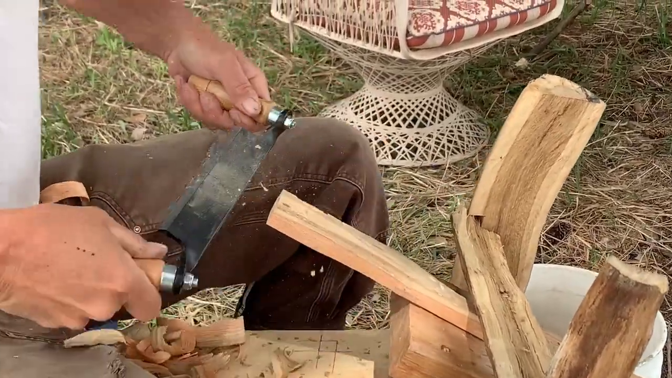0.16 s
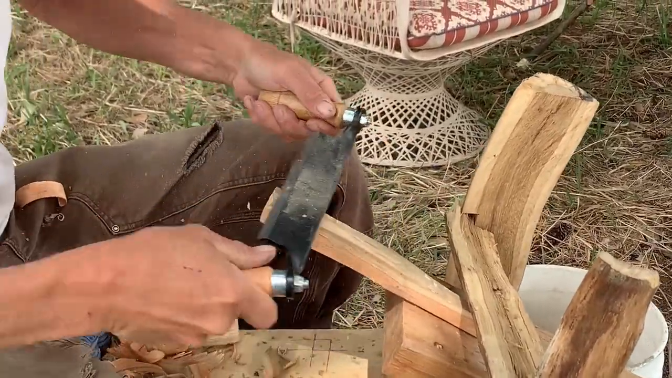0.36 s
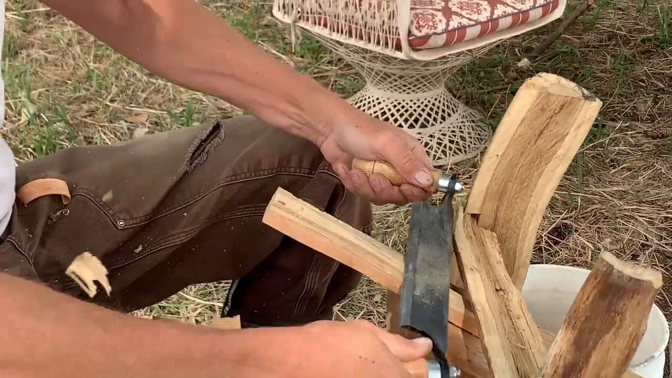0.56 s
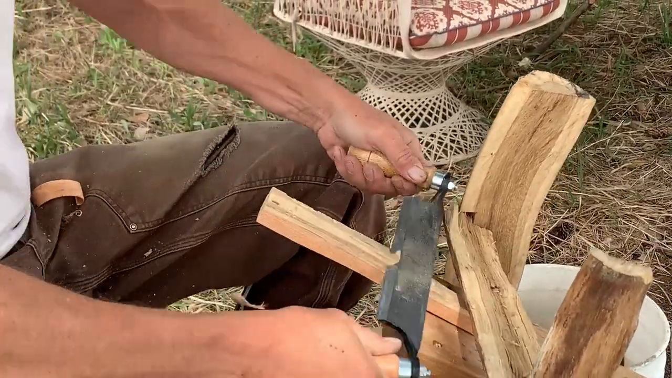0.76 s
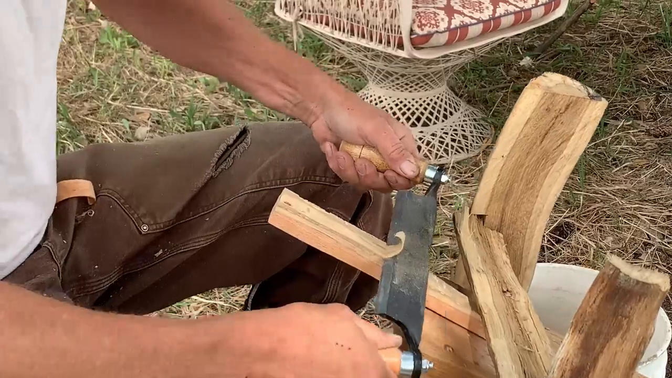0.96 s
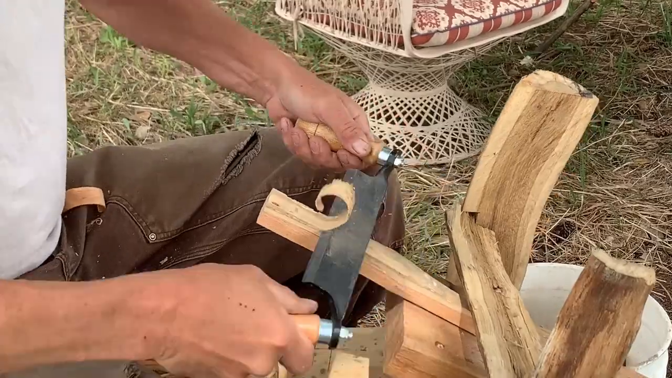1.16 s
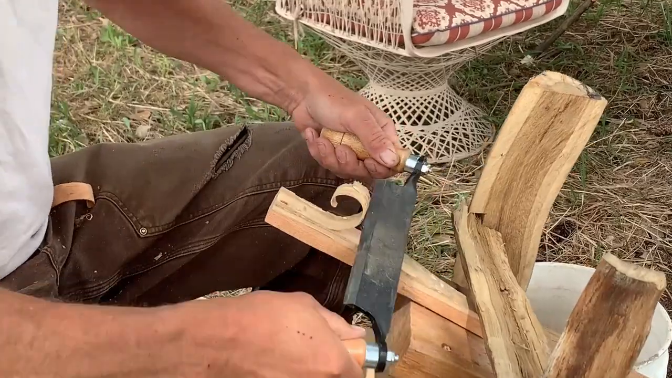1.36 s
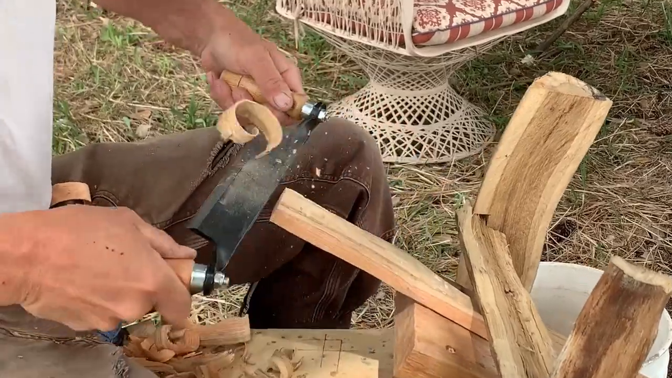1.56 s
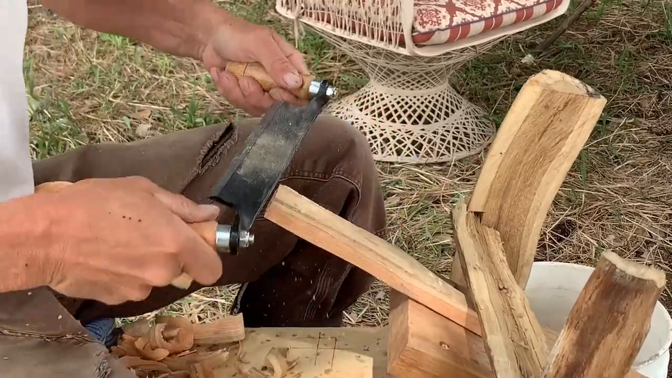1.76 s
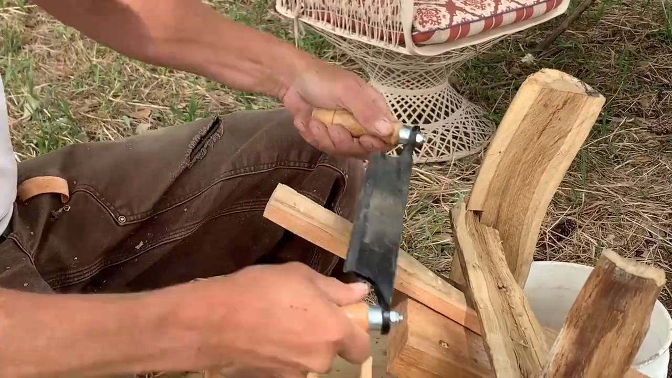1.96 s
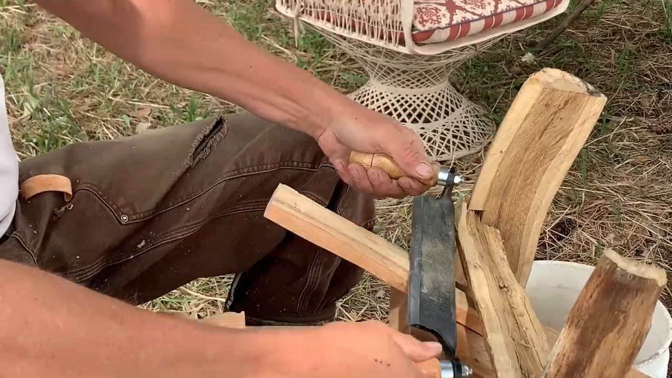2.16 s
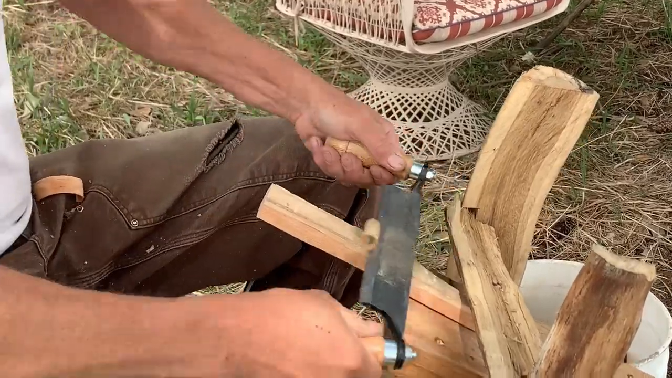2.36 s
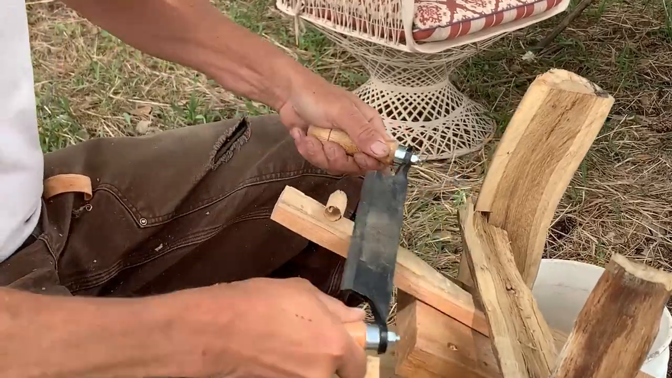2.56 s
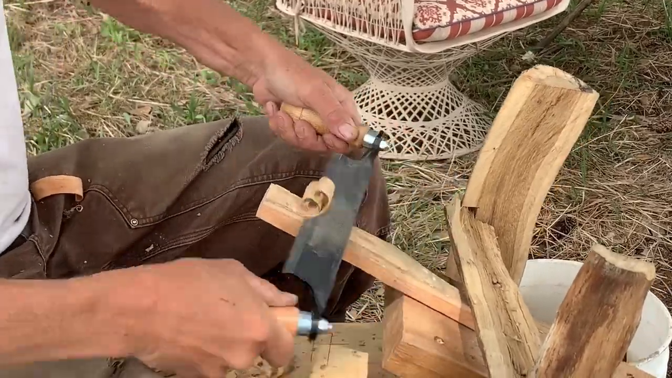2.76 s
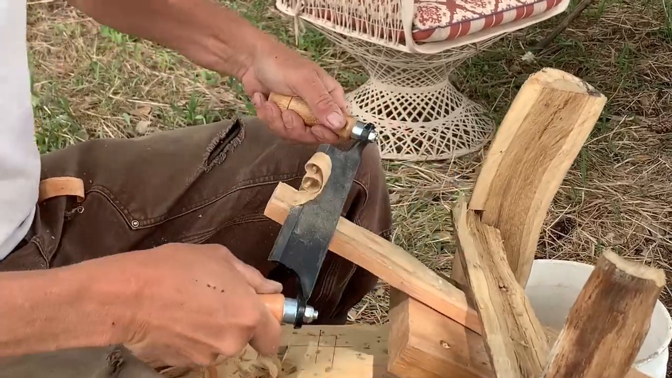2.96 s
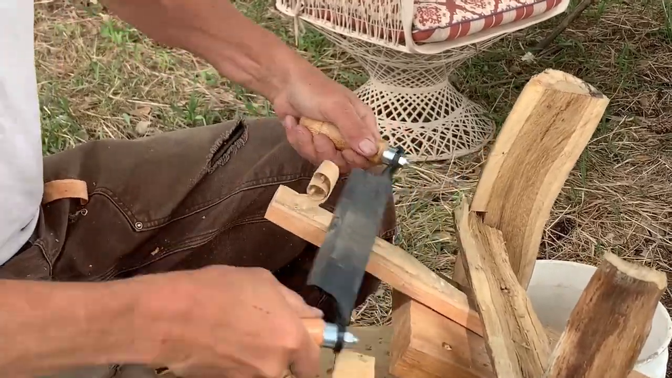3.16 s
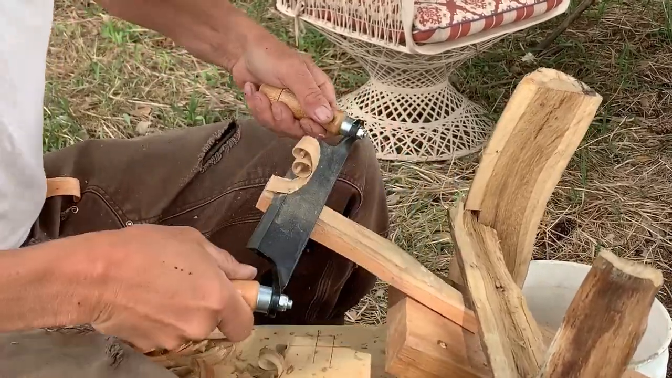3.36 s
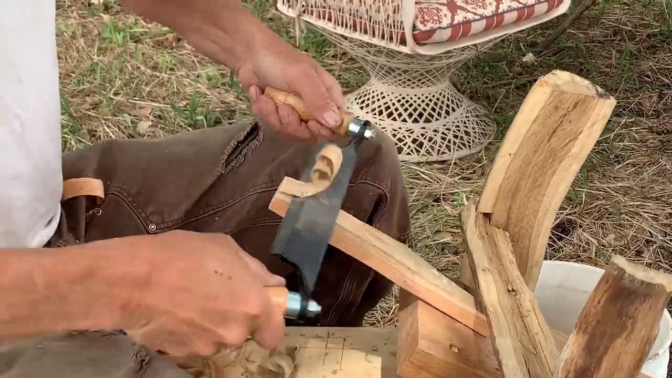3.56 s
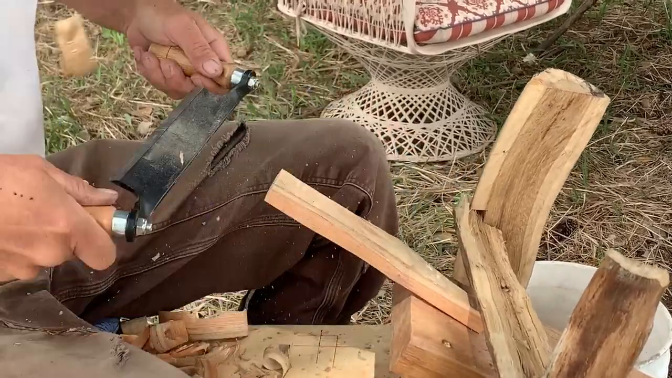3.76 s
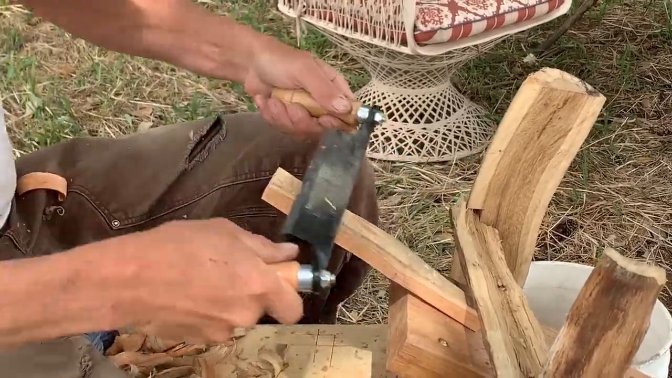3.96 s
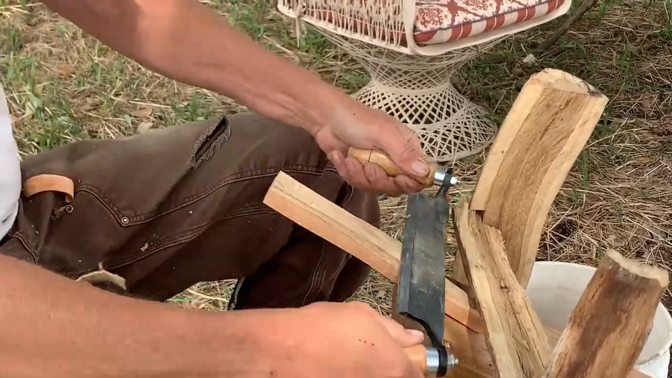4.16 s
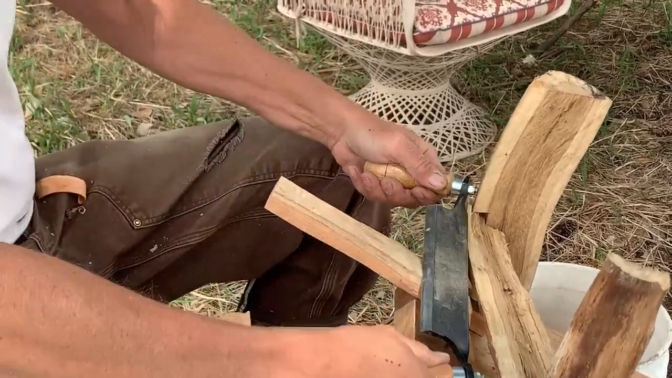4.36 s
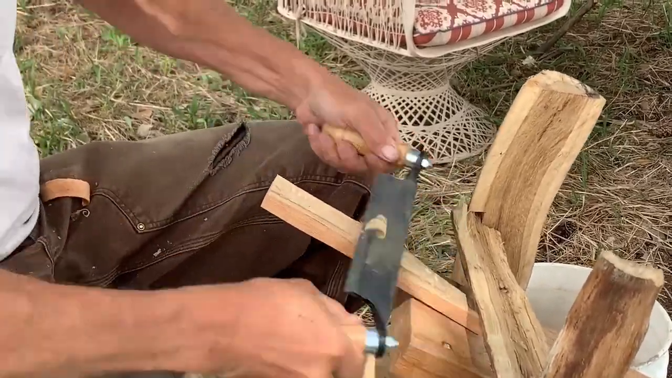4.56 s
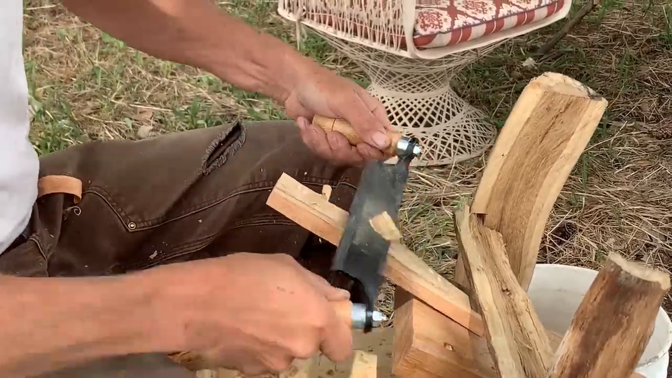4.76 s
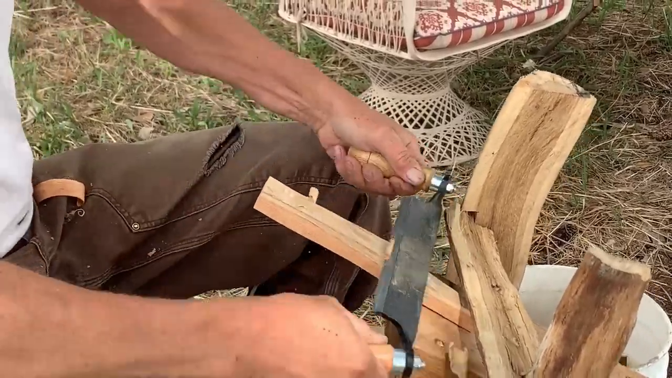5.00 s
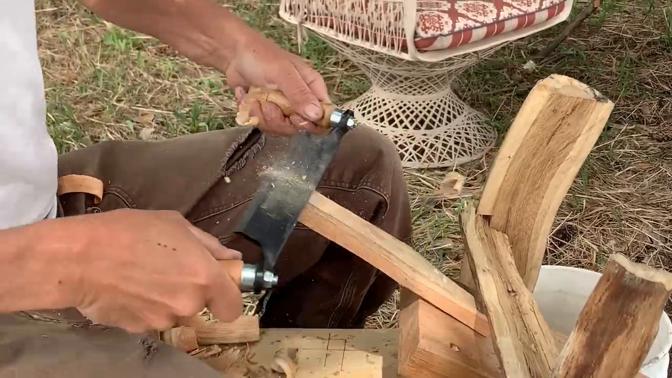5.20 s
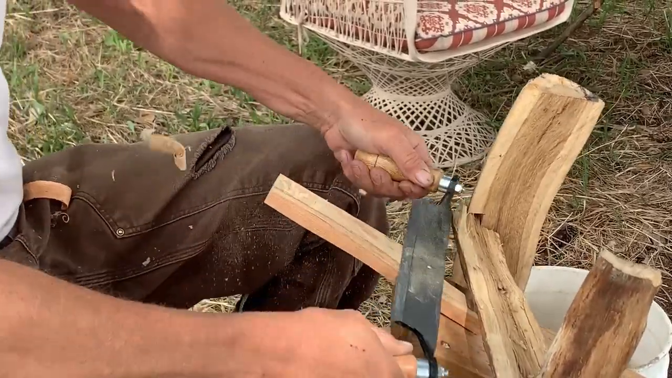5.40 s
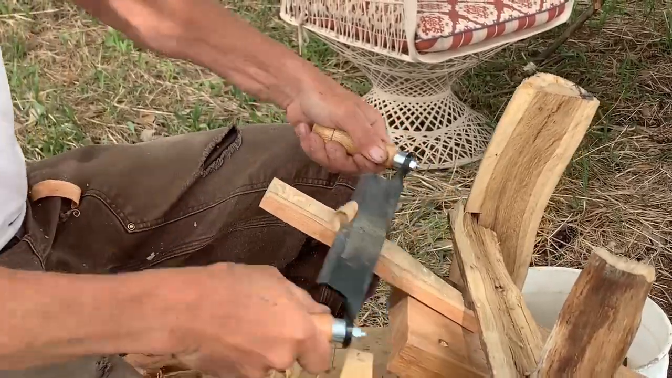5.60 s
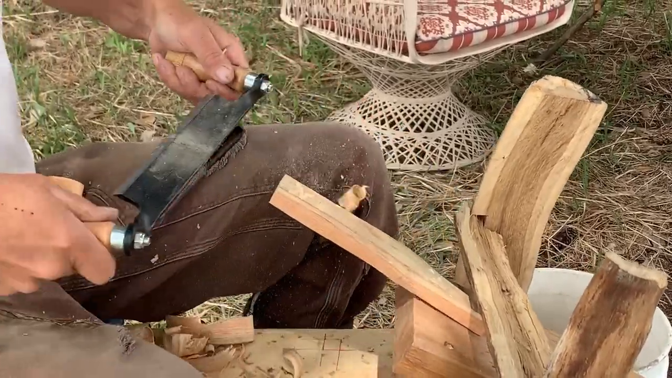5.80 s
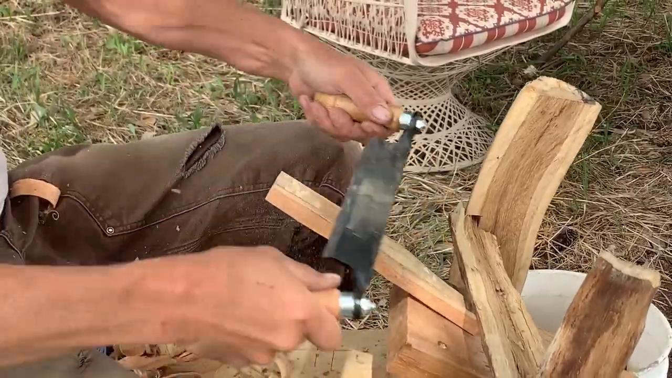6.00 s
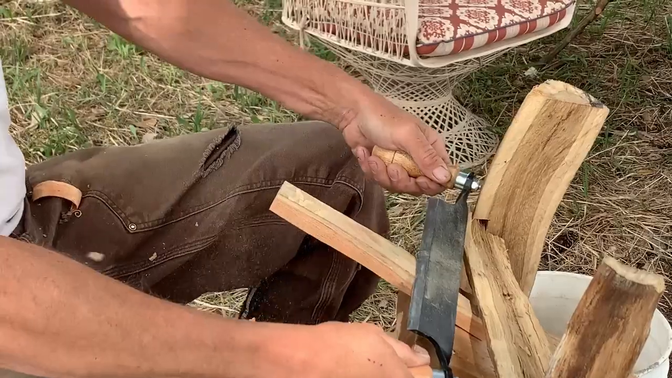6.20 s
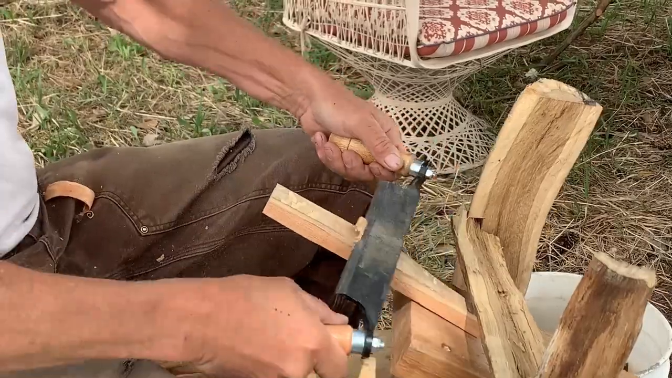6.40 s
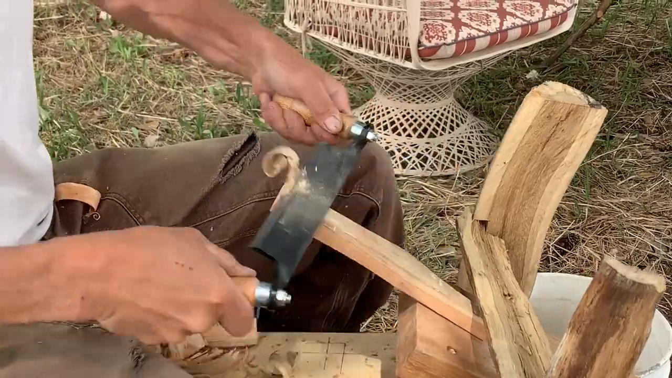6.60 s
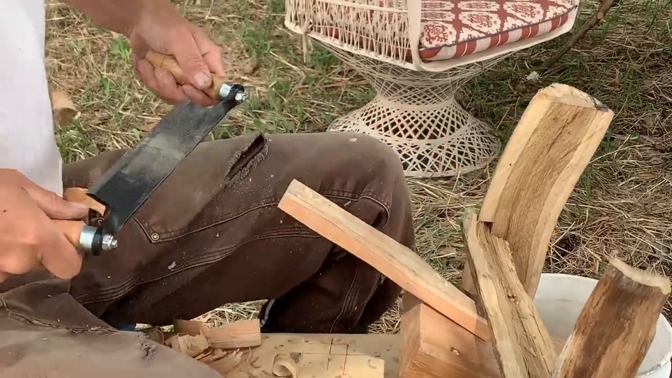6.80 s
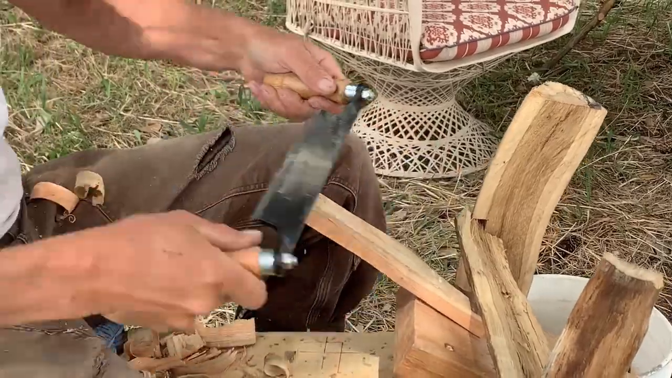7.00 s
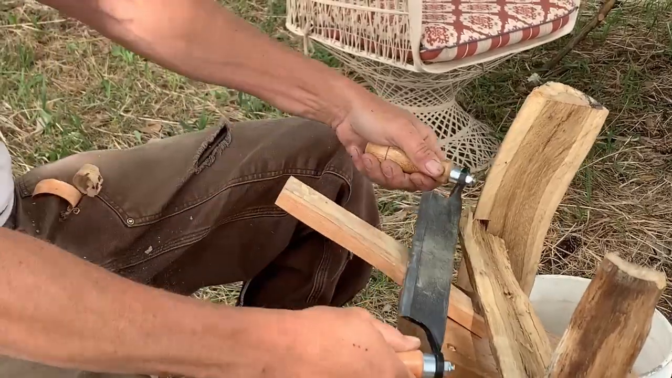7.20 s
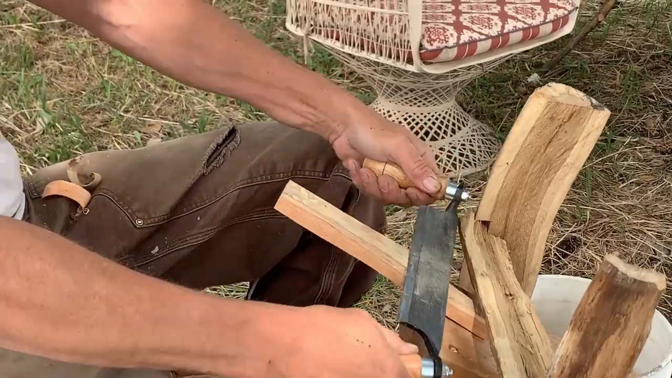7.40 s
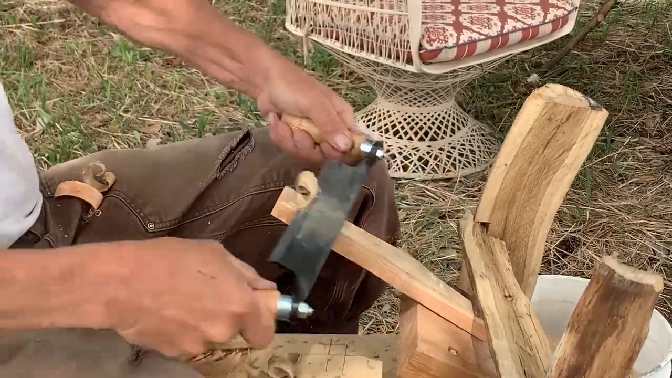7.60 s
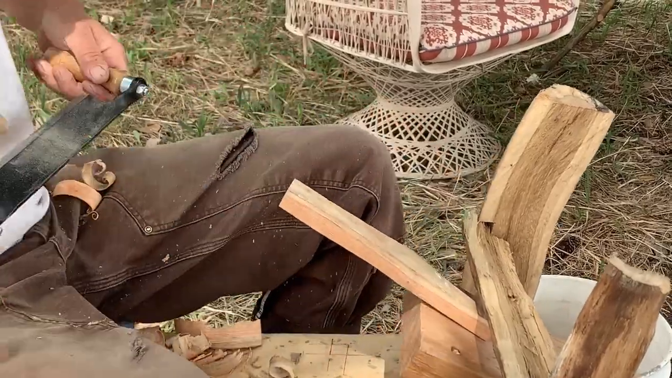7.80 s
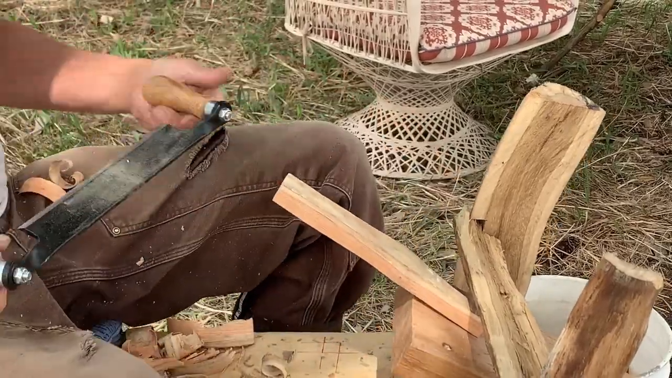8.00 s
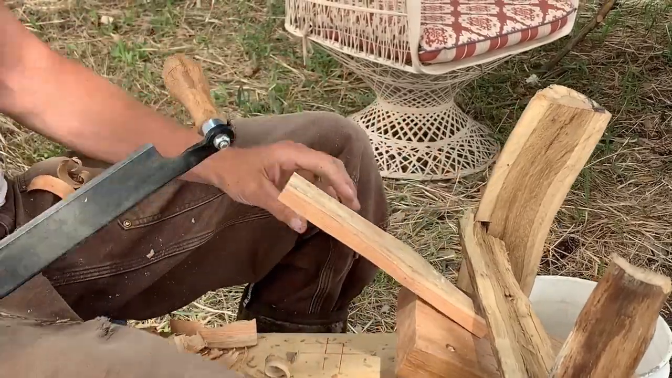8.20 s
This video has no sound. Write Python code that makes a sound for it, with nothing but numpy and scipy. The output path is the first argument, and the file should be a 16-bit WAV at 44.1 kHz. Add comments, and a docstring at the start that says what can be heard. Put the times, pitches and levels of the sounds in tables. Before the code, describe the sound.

Close up outdoors, a steel drawing blade shaves a clamped hardwood stick. Short, hissing, tearing scrapes of a fraction of a second come about every half second or so, each preceded or followed by clacks as blade meets wood. Some knocks ring steely and hard, others thud in the bench. Light slides and dry crumb ticks fill the gaps over a faint airy hush and low hum. Close stereo phone pickup, almost no echo.

```python
"""Drawknife on a hardwood stick

A two-handled steel blade is pulled along a hardwood stick clamped in a wooden bench, outdoors, near a phone.
Each pull tears fibres in a stream of tiny slips that ring blade and stick and shake the bench.
Knocks, snaps and ticks are short rattling contacts that ring the same blade and wood; light slides
and dry crumb ticks fill in around them, over a faint open-air hush and low hum made of filtered noise."""
import sys
import numpy as np
from scipy import signal
from scipy.fft import rfft, irfft
from scipy.io import wavfile
from scipy.ndimage import uniform_filter1d, map_coordinates

SR = 44100
rng = np.random.default_rng(int(sys.argv[2]) if len(sys.argv) > 2 else 0)


def makeup_ratio(level_db):
    """Linear amplitude ratio for a level in decibels (20 dB per factor of ten)."""
    decades = np.asarray(level_db, float) / 20
    return 10 ** decades


def to_wav(s):
    """Save 16-bit WAV."""
    ch = np.atleast_2d(s).T  # columns
    pcm = np.round(np.clip(ch, -1, 1) * 32767)  # PCM
    wavfile.write(sys.argv[1], SR, pcm.astype(np.int16))


N = 363825
T = np.arange(N) / SR


def unit(x):
    """Scale to rms 1."""
    return x / np.sqrt(np.mean(x ** 2))


def on_log(hz, table, column=1):
    """Read a table at frequencies, straight on a log axis."""
    table = np.array(table, float)
    return np.interp(np.log(np.maximum(hz, 1)), np.log(table[:, 0]), table[:, column])


def colour(x, table):
    """Filter by a (Hz, dB) spectrum."""
    return irfft(rfft(x) * makeup_ratio(on_log(np.fft.rfftfreq(len(x), 1 / SR), table)), len(x))


def ring(x, hz, width_hz):
    """One resonance, gain 1 at its centre."""
    return signal.lfilter(*signal.iirpeak(hz, hz / width_hz, fs=SR), x)


def walk(rate):
    """Random levels held 1 / rate s and slewed twice; spread near 1."""
    k = int(SR / rate)
    steps = np.repeat(rng.standard_normal(N // k + 1), k)
    return 1.685 * uniform_filter1d(uniform_filter1d(steps, k), k)[:N]


def slips(per_s, spread_db):
    """A stream of tiny slips of very uneven size and either sign, rms 1."""
    chance = rng.random((3, N))
    size = makeup_ratio(-spread_db * np.log(1 - chance[1])) * np.sign(chance[2] - .5)
    return unit((chance[0] < per_s / SR) * size)


# colour of the open-air hush: hz, density_db (dB per Hz, shape only)
YARD_COLOUR = [(27, -44), (38, -6.5), (70, -0.5), (110, -1.5), (250, -16.5), (450, -13.5), (1000, -21.5),
               (2200, -26.5), (4000, -34.5), (15500, -48), (16200, -66)]
# low hum as narrow bands of noise: hz, width_hz, level_db (rms)
HUM_BANDS = [(71.5, 18, -56.5), (147, 5.3, -67.5)]
HUSH_DB = -59


def yard():
    """Open-air hush of slowly wandering noise, and a low hum that wavers because its bands are narrow."""
    level_db = HUSH_DB + walk(0.47) + 1.8 * walk(22)
    hush = makeup_ratio(level_db) * unit(colour(rng.standard_normal(N), YARD_COLOUR))
    hum = sum(makeup_ratio(db) * unit(ring(rng.standard_normal(N), hz, width)) for hz, width, db in HUM_BANDS)
    return hush + hum


# colour of tearing fibres at the microphone, shared by cracks and crumbs: hz, density_db (dB per Hz, shape only)
FIBRE_COLOUR = [(2200, -29), (3300, -4.5), (4500, 1.5), (5500, -4), (6000, 1.5), (6600, -1.5), (8300, 2.5),
                (9600, -4.5), (14500, -4.5), (15600, -3.5), (16100, -31.5)]
CRUMBS_PER_S, CRUMBS_DB, CRUMB_DECAY_S = 22, -75, .002


def crumbs():
    """Bits of shaving drop and settle with faint dry ticks, each a decaying burst of noise."""
    t = np.arange(1024) / SR
    bursts = signal.fftconvolve(np.abs(slips(CRUMBS_PER_S, 3)), np.exp(-t / CRUMB_DECAY_S))[:N]
    return makeup_ratio(CRUMBS_DB) * unit(bursts * colour(rng.standard_normal(N), FIBRE_COLOUR))


def rings(contact, modes, lean_db, damping):
    """One blow on a set of modes, peak 1; damping widens every mode."""
    sound = sum(makeup_ratio(db + lean) * ring(contact, hz, damping * width)
                for (hz, width, db), lean in zip(modes, lean_db))
    return sound / np.abs(sound).max()


# rings of the steel blade: hz, width_hz, level_db
BLADE_RINGS = [(1260, 20, -22.5), (1449, 110, -18), (1529.8, 140, -9.5), (1720, 150, -14.5),
               (1920, 51, -3.5), (2170, 72, -6), (2325, 35, -13), (2500, 83, -15), (2946, 59, -10),
               (3304, 57, -20.5), (4140, 640, -24), (4530, 140, -37)]
# rings of the clamped stick: hz, width_hz, level_db
STICK_RINGS = [(311, 43, -4), (499, 38, -13), (579, 39, -7.5), (702, 24, -3.5), (846.4, 25, 1),
               (936, 22, -14.5), (1180, 52, -11)]
# rings of the bench: hz, width_hz, level_db
BENCH_RINGS = [(97.5, 11, -4), (163.4, 35, -5.5), (204.5, 23.5, 2.5), (250.3, 40, -0.5)]
# knocks, snaps and ticks: hit_s, peak_db (of the blade ring), strongest_hz (rings near it are favoured),
# thud_db (dull wood re peak_db, before THUD_LIFT_DB), crack_db (peak of the crack re peak_db)
HIT_LIST = [(0.0365, -32.5, 2170, -5, -6.5), (0.105, -13, 850, 0, 9), (0.117, -15.5, 1920, -13, -6),
            (0.137, -18, 1990, -9, -2.5), (0.376, -39, 1380, -8.5, -12), (0.445, -25.5, 2280, -9.5, -2.5),
            (0.5498, -13, 1920, -14.5, -22.5), (0.6792, -44, 700, 10, -34.5),
            (1.0677, -28, 2080, -13, -14.5), (1.4067, -25.5, 2220, -14, -34), (1.672, -46.5, 1260, -2, -38),
            (1.72, -28, 1945, 5, -11.5), (1.9032, -52.5, 1080, -7, 24), (2.1212, -15, 1920, -14, -57),
            (2.2184, -32, 1920, -2.5, -33), (2.2868, -32.5, 2100, -12, -38.5),
            (2.8761, -6.5, 2160, -19, 4.5), (3.2868, -14, 850, -1, 1.5), (3.3054, -16.5, 2180, -23, 9.5),
            (3.3594, -29.5, 1980, -13.5, 15.5), (3.541, -29.5, 2130, -11, -20),
            (3.645, -26.5, 2228, -9, -21.5), (3.657, -28, 1920, -7, -9.5), (3.6649, -15, 1920, -15.5, 11.5),
            (3.7603, -33, 2170, -7, -9), (3.796, -24.5, 2270, -13.5, -5.5), (3.927, -35, 1484, -30, -11),
            (4.053, -37, 1390, -5, -32), (4.2637, -34.5, 1540, 1.5, -26), (4.3512, -31.5, 2050, -5, -7.5),
            (4.3893, -52, 580, 13.5, -19), (4.6826, -5, 1920, -21.5, -40.5),
            (4.8985, -10.5, 1870, -12, -17), (5.1848, -19, 1935, -10.5, -16.5),
            (5.3383, -37.5, 2110, -12.5, 4.5), (5.452, -6, 1910, -20.5, -14.5),
            (5.5249, -24, 2070, -5.5, -6.5), (5.8704, -30, 2170, -16.5, -49),
            (6.131, -40, 1423, -14, -10.5), (6.2034, -23, 2170, -6.5, -32), (6.2381, -25, 1480, -5.5, -15),
            (6.3217, -33.5, 2300, -6, -38.5), (6.344, -31, 2250, -13.5, -22), (6.7797, -27, 1380, -23, 3.5),
            (6.9046, -37, 1245, -10, -34.5), (7.1347, -39, 1260, -6, -39), (7.341, -21, 1920, -5.5, -36),
            (7.397, -28.5, 1920, -2.5, -43), (7.8323, -38, 1370, -15, 4.5),
            (7.9146, -27.5, 2260, -14.5, -3.5), (8.1491, -36, 2100, -9.5, -29),
            (8.2034, -31.5, 2280, -27.5, 6.5), (4.073, -41, 1390, -10, -6.5), (7.5112, -37, 1936, -27, -28),
            (3.6722, -14.5, 1850, -10, -31.5), (0.2162, -36, 1740, -12.5, -0.5),
            (0.2583, -44.5, 1230, -5.5, -8), (0.633, -33.5, 1920, -8, -9),
            (0.8314, -32, 1910, -17.5, -14.5), (0.9856, -45.5, 2100, -21, 5), (1.1322, -33, 2210, -7, -17),
            (1.5594, -16, 1920, -13.5, 12), (2.0288, -44.5, 1770, -28, 2.5),
            (1.569, -19.5, 1910, -12.5, 9.5), (3.0906, -44.5, 1260, -6, 6), (3.1498, -31, 1960, -5, -31),
            (3.223, -37, 1270, -5, -21), (4.126, -45.5, 2170, -14, -9), (4.4171, -43.5, 1830, -16, 10.5),
            (4.5, -28, 1940, -32, -2.5), (4.5266, -20.5, 1920, -28, -1), (4.5574, -37.5, 1910, -32, -7.5),
            (4.7987, -41.5, 1410, -10.5, -6), (5.3004, -40.5, 1410, -5.5, -18),
            (5.7477, -14, 1900, -29, -22), (5.7872, -32.5, 1460, -10.5, 6.5), (5.8975, -47, 2140, -30, 0.5),
            (6.6916, -16, 2130, -28, -2.5), (6.753, -35.5, 1980, -8, -14), (7.448, -29, 1990, -14, -32),
            (7.4879, -24.5, 1950, -31, -8)]
THUD_LIFT_DB = 5.0
KNOCK_TOP_HZ = 2760  # wood cushions a blow: little above this
THUD_RISE_S = 0.0045  # stick and bench answer a blow late and ring on
DROOP, DROOP_S = .15, .012  # a struck stick starts this fraction sharp and sags as the blade's pressure eases
LEAD_IN_S, LEAD_IN_DB = .012, -46  # faint noise swells up just before each blow


def hits():
    """Each blow is a few ms of rattling contact; where it lands decides which rings sound."""
    out, clock = np.zeros(N + 4096), np.arange(4096) / SR - LEAD_IN_S
    t = np.maximum(clock, 0)
    blade_hz = np.transpose(BLADE_RINGS)[0]
    wood = np.vstack([STICK_RINGS, BENCH_RINGS])
    wood_hz = wood[:, 0]
    hiss = colour(rng.standard_normal(len(out)), FIBRE_COLOUR)
    cushion = signal.butter(3, KNOCK_TOP_HZ, fs=SR, output="sos")
    soft_db = -9 * np.maximum(np.log2(blade_hz / 2200), 0)  # wood cushions the steel

    # the contact builds, dies fast and skitters on faintly
    contact_shape = np.minimum(t / 0.0052, 1) ** 2 * (np.exp(-t / 0.0016) + 0.01 * np.exp(-t / 0.014))
    lead_in_shape = makeup_ratio(LEAD_IN_DB) * np.exp(-3 * np.abs(clock) / LEAD_IN_S)
    thud_shape = t ** 2 * np.exp(-t / THUD_RISE_S)
    crack_shape = np.minimum(t / 0.002, 1) ** 2 * (np.exp(-t / 0.003) + 0.06 * np.exp(-t / 0.012))
    droop_clock = clock + DROOP * DROOP_S * (1 - np.exp(-t / DROOP_S))

    for hit_s, peak_db, strongest_hz, thud_db, crack_db in HIT_LIST:
        def near_db(hz):
            """Favour the rings close to the strongest one."""
            return 11 * np.exp(-(np.log(hz / strongest_hz) / 0.08) ** 2)

        rattle = rng.standard_normal(len(t))
        start = int((hit_s - .0012 - LEAD_IN_S) * SR)
        span = slice(start, start + len(t))

        contact = signal.sosfilt(cushion, rattle * contact_shape + rattle * lead_in_shape)
        blade_lean_db = 2 * rng.standard_normal(len(BLADE_RINGS)) + near_db(blade_hz) + soft_db
        blade = rings(contact, BLADE_RINGS, blade_lean_db, 1.3)

        push = signal.sosfilt(cushion, rattle * thud_shape)
        wood_lean_db = 6.0 * rng.standard_normal(len(wood)) - 7 * (wood_hz < 400) + near_db(wood_hz)
        thud = np.interp(droop_clock, clock, rings(push, wood, wood_lean_db, 1.3))

        crack = hiss[span] * crack_shape
        crack = crack / np.abs(crack).max()
        out[span] += makeup_ratio(peak_db) * (blade + makeup_ratio(thud_db + THUD_LIFT_DB) * thud + makeup_ratio(crack_db) * crack)
    return out[:N]


# the edge takes at most this long to catch, starting this far under the steady cut
BITE_S, BITE_DB = 0.035, -17.5
FADE_S = 0.093  # after the edge leaves the wood the last fibres settle


def stroke(at_s, start, dig, hold, lift, lift_db, swell_db):
    """Level of one stroke re its top in dB: bite, dig in, cut, lift off, fade."""
    bite = min(BITE_S, dig)
    return np.interp(at_s, start + np.cumsum([-bite, bite, dig, hold, lift, FADE_S]),
                     [-60, BITE_DB - swell_db, -swell_db, 0, lift_db, -60])


# pulls of the blade: bite_s (time), dig_s, cut_s (lengths), scrape_db (edge), weight_db (on the bench)
PULL_LIST = [(0.101, 0.0023, 0.026, -16.5, -30.5), (0.746, 0.086, 0.071, -27, -28),
             (1.151, 0.024, 0.066, -20, -21), (1.467, 0.027, 0.065, -20.5, -27),
             (2.348, 0.09, 0.083, -22, -26), (2.61, 0.054, 0.023, -32.5, -49.5),
             (2.757, 0.049, 0.067, -18.5, -25.5), (3.253, 0.028, 0.034, -29, -21.5),
             (3.648, 0.015, 0.0084, -26, -33.5), (4.484, 0.086, 0.14, -26.5, -30.5),
             (5.025, 0.07, 0.066, -24, -24), (5.178, 0.0042, 0.023, -14.5, -25),
             (5.582, 0.042, 0.077, -24, -40), (5.713, 0.012, 0.034, -23.5, -37.5),
             (6.385, 0.062, 0.013, -23, -37.5), (6.45, 0.069, 0.058, -26.5, -26),
             (6.622, 0.027, 0.048, -21.5, -32), (7.472, 0.16, 0.081, -20, -26)]
# the blade slides lightly over the wood: start_s, length_s, scrape_db (edge), weight_db (on the bench)
SLIDE_LIST = [(0.134, 0.029, -44, -39), (0.636, 0.031, -47, -35.5), (1.044, 0.046, -48, -48),
              (1.357, 0.03, -46.5, -46), (2.227, 0.043, -51.5, -43.5), (3.095, 0.096, -52.5, -43),
              (3.683, 0.018, -36.5, -37), (4.37, 0.039, -56, -38), (4.898, 0.019, -36, -38),
              (5.47, 0.034, -46, -39.5), (5.75, 0.02, -50, -34), (6.204, 0.045, -49.5, -35.5),
              (6.707, 0.03, -39, -41), (7.381, 0.019, -44, -45)]
# floor while the blade only hovers on the wood: edge_db, bench_db, fibres_db
HOVER_DB = (-82, -62, -88)
LIFT_S, LIFT_DB = 0.033, -27  # the edge leaves the wood
TEAR_LIFT_S = 0.025  # tearing stops short when the shaving comes free
BENCH_LAG_S, BENCH_LIFT_S, BENCH_LIFT_DB = 0.0057, 0.035, -24.5  # the bench takes the weight late and sways on
# tearing re the edge, for a 0.1 s dig with the weight 8 dB under the scrape
TEAR_DB = -10
TEAR_DB_PER_HALVING, TEAR_SWELL_DB = 1.5, 5.5  # a quicker dig tears louder, most near the end
TEAR_PER_WEIGHT = 0.42  # dB of tearing per dB of weight: a deeper cut tears more
SLIDE_ONSET_S, SLIDE_TEAR_DB = 0.022, -14


def work():
    """Edge, bench and fibre levels in dB over time; the loudest stroke at each moment rules."""
    at_s = np.arange(0, N / SR, 1 / 1000)
    rows = []
    for start, dig, hold, edge_db, weight_db in PULL_LIST:
        tear_db = TEAR_DB - TEAR_DB_PER_HALVING * np.log2(10 * dig)
        tear_db += TEAR_PER_WEIGHT * (weight_db - edge_db + 8)
        rows.append((start, dig, hold, edge_db, weight_db, tear_db))
    for start, hold, edge_db, weight_db in SLIDE_LIST:
        rows.append((start, SLIDE_ONSET_S, hold, edge_db, weight_db, SLIDE_TEAR_DB))

    levels = np.array(HOVER_DB)[:, None] + 0 * at_s
    for start, dig, hold, edge_db, weight_db, tear_db in rows:
        edge = edge_db + stroke(at_s, start, dig, hold, LIFT_S, LIFT_DB, 0)
        bench = weight_db + stroke(at_s, start + BENCH_LAG_S, dig, hold, BENCH_LIFT_S, BENCH_LIFT_DB, 0)
        fibres = edge_db + tear_db + stroke(at_s, start, dig, hold, TEAR_LIFT_S, LIFT_DB, TEAR_SWELL_DB)
        levels = np.maximum(levels, [edge, bench, fibres])
    return [np.interp(T, at_s, level) for level in levels]


def body(force, modes, drift_db):
    """A force rings every mode; as the edge travels it meets each mode more or less strongly."""
    gain = np.sqrt(sum(makeup_ratio(2 * db) * width * np.pi / SR for hz, width, db in modes))
    return sum((-1) ** k * makeup_ratio(db) * ring(force * makeup_ratio(drift_db * walk(14)), hz, width)
               for k, (hz, width, db) in enumerate(modes)) / gain


def shifting(x):
    """Each narrow band swells and fades on its own as the curl of shaving grows and bends."""
    bands_hz = 2500 * 2 ** np.arange(0, 2.7, 1 / 6)
    flicker_db = 3
    return unit(sum((-1) ** k * makeup_ratio(flicker_db * walk(25)) * ring(x, hz, hz / 9)
                    for k, hz in enumerate(bands_hz)))


def strokes():
    """The edge sticks and slips through the grain; the shaving tears off with a hiss."""
    edge_db, weight_db, tear_db = work()
    # a light touch skips and makes contact in patches
    light = np.clip((-47 - edge_db) / 14, 0, 1)
    touch_db = 1.0 * walk(35) + (2.0 + 3 * light) * walk(140) + light * (2.0 * walk(22) - 4)
    # thicker fibres break one by one and jolt blade and stick
    breaks = slips(600, 3)

    blade = body(makeup_ratio(edge_db + touch_db) * (slips(9000, 2.0) + 0.2 * breaks), BLADE_RINGS, 1.8)
    # the stick bends under both the edge and the weight behind it
    stick_db = 0.68 * edge_db + 0.28 * weight_db + touch_db - 12.0
    stick = body(makeup_ratio(stick_db) * (slips(5000, 2.6) + 0.39 * breaks), STICK_RINGS, 4.0)
    bench_db = weight_db + light * (4.5 * walk(14) - 3.5)
    bench = body(makeup_ratio(bench_db) * slips(3000, 3.1), BENCH_RINGS, 1.9)

    fibre_db = tear_db + touch_db + 1.7 * walk(300) - 0.5
    fibres = makeup_ratio(fibre_db) * shifting(unit(colour(slips(15000, 1.4), FIBRE_COLOUR)))
    snaps = makeup_ratio(tear_db + touch_db - 7) * unit(colour(breaks, FIBRE_COLOUR))
    # gentle tearing lacks the top
    top = signal.sosfilt(signal.butter(2, 9000, "high", fs=SR, output="sos"), fibres)
    dull = np.clip((-42 - tear_db) / 18, 0, .8)

    # the free length of stick changes under the moving edge, so its rings and the blade's slide in pitch
    sliding = np.interp(T + .0007 * walk(9), T, blade + stick)
    return sliding + bench + fibres - dull * top + snaps * (1 - dull)


# the two microphone ports: hz, pan_db (left minus right), lead_rad (left leads)
PORT_PAIR = [(100, -1.2, 0), (900, -2.5, .5), (1400, -1.6, .6), (1750, -1.5, .1), (2400, -1.8, 0),
             (2750, -2, 1.3), (4500, -.5, 2.5), (5050, -.5, 3.14), (6100, -3, .3), (7500, .3, 2.2),
             (9300, 0, 0), (11450, 0, -3.14), (13900, -.3, -6.28), (16000, -.7, -9)]
SWAY_S = 11e-6  # spread of the time difference between ports as the work sways before them


def scene():
    """All sources reach two ports, with a faint scatter from things nearby that differs between them."""
    near = strokes() + hits() + crumbs()
    hz = np.fft.rfftfreq(N, 1 / SR)
    port_hz, pan_db, lead_rad = np.transpose(PORT_PAIR)
    side = np.array([[.5], [-.5]])  # left, right: each takes half of every difference

    t = np.arange(2048) / SR
    scatter = rng.standard_normal((2, len(t))) * np.exp(-t / 0.024)
    scatter = scatter / np.linalg.norm(scatter, axis=1, keepdims=True)
    scatter = rfft(scatter, N) * np.clip(300 / (hz + 1), .06, .21)  # stronger in the bass
    direct = np.exp(1j * side * np.interp(hz, port_hz, lead_rad))
    ports = makeup_ratio(side * np.interp(hz, port_hz, pan_db)) * (direct + scatter)

    # the hush is alike at both ports in the bass only
    apart = colour(yard(), [(150, -14.0), (2000, 3.5)])
    lag = side * SWAY_S * SR * walk(5)  # samples
    heard = [map_coordinates(v, [np.arange(N) + d], mode="mirror")
             for v, d in zip(irfft(rfft(near) * ports, N), lag)]
    return np.array(heard) + makeup_ratio(-1.5 * side) * yard() + 2 * side * apart


def roll_off(x):
    """The treble ends steeply here."""
    return signal.sosfilt(signal.butter(12, 17000, fs=SR, output="sos"), x)


def record(dry):
    """The phone rounds the loudest peaks."""
    mix = np.tanh(0.85 * dry) / 0.86
    return roll_off(mix)


dry = scene()
out = record(dry)
to_wav(out)
```